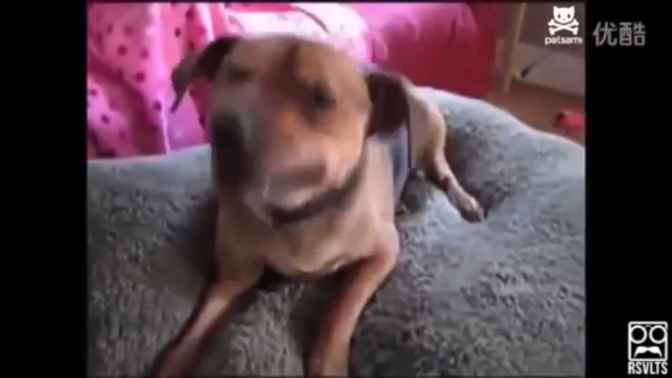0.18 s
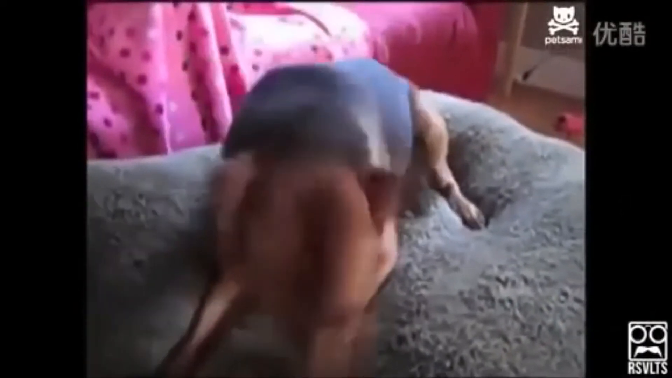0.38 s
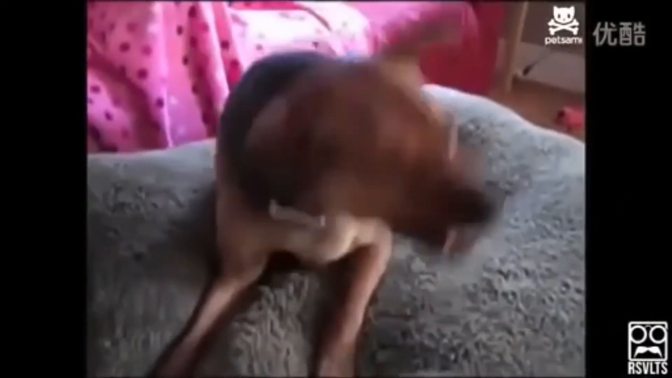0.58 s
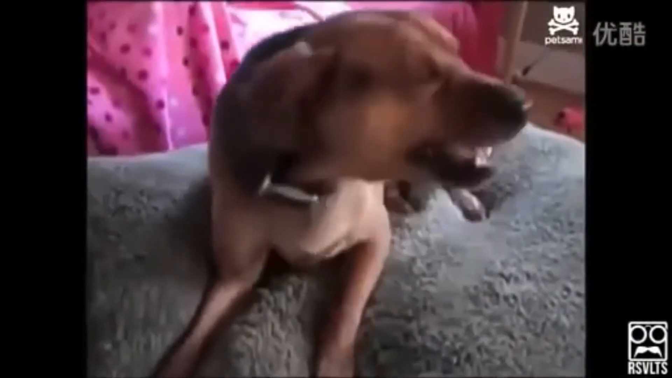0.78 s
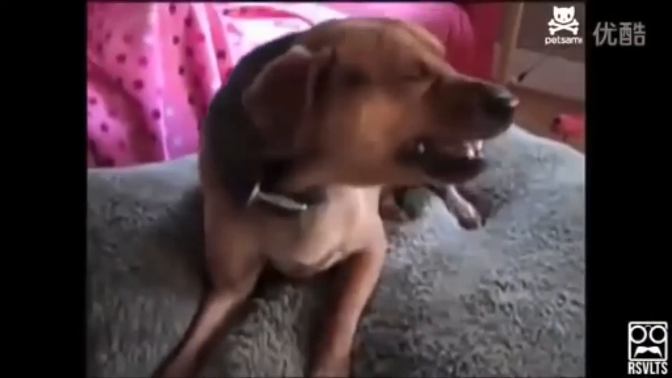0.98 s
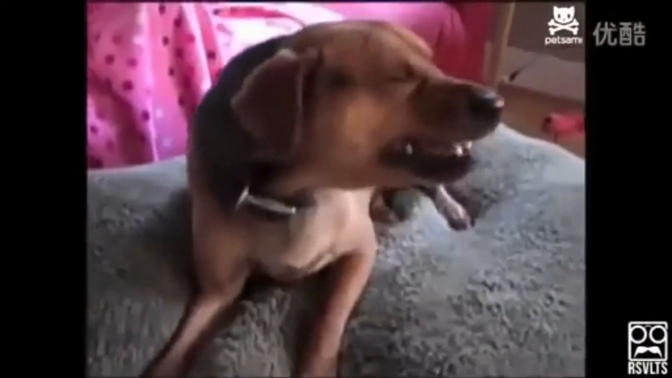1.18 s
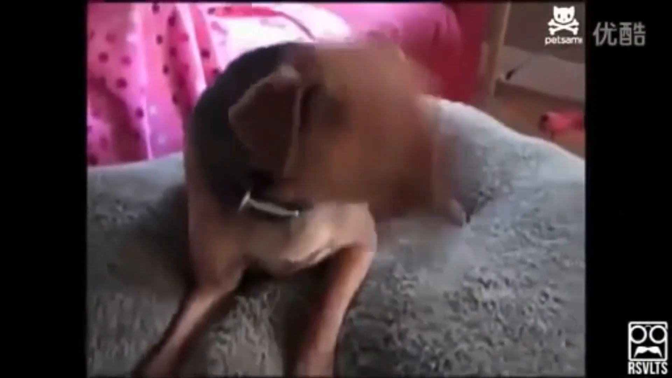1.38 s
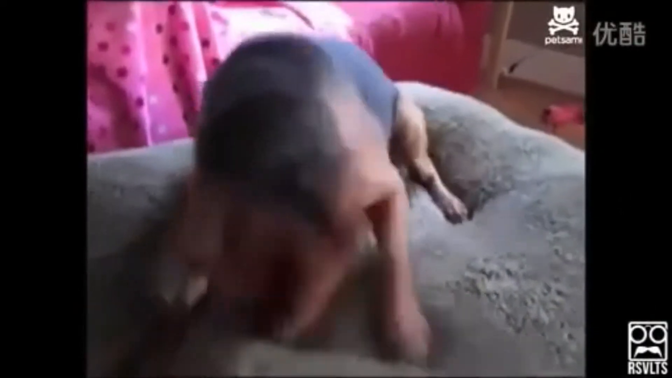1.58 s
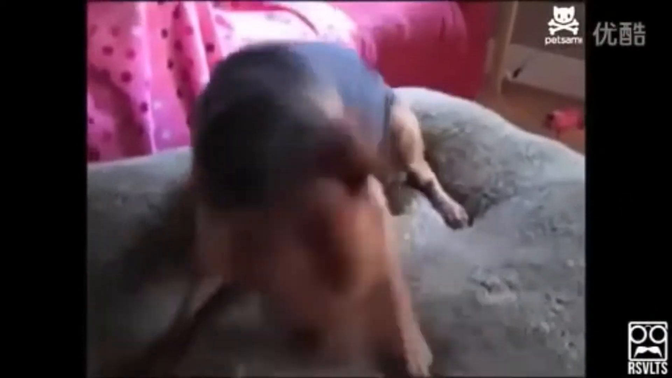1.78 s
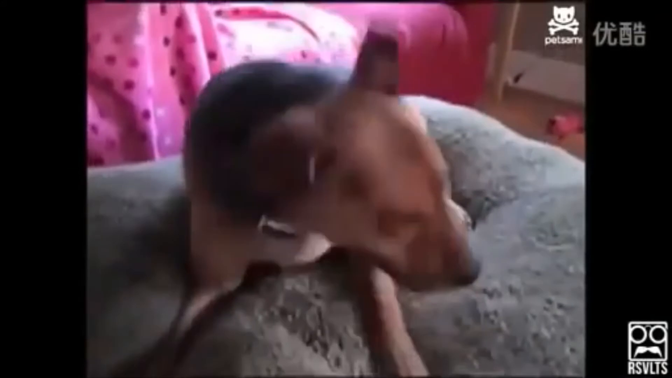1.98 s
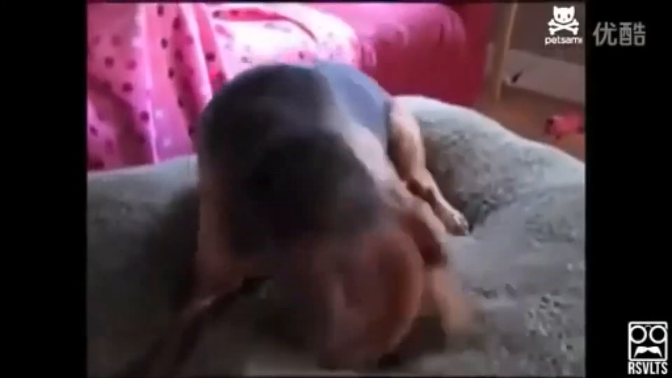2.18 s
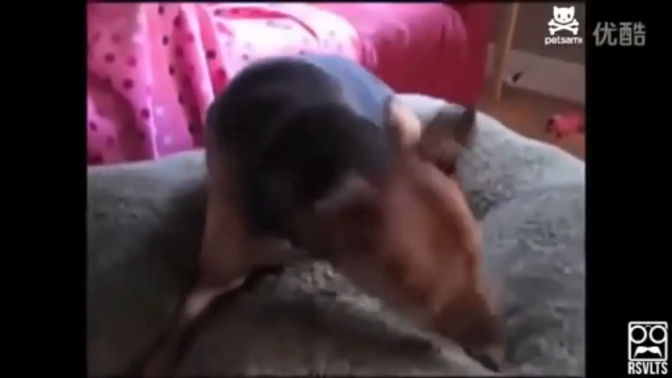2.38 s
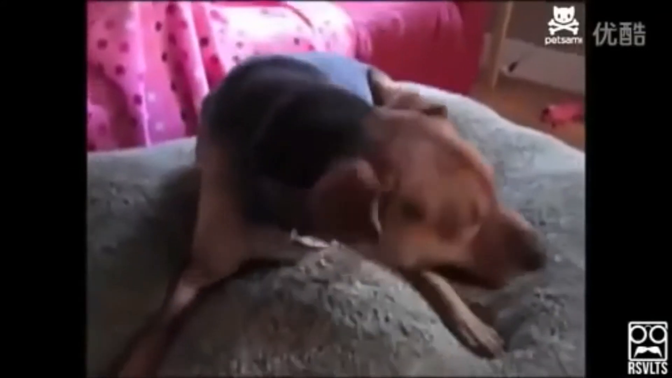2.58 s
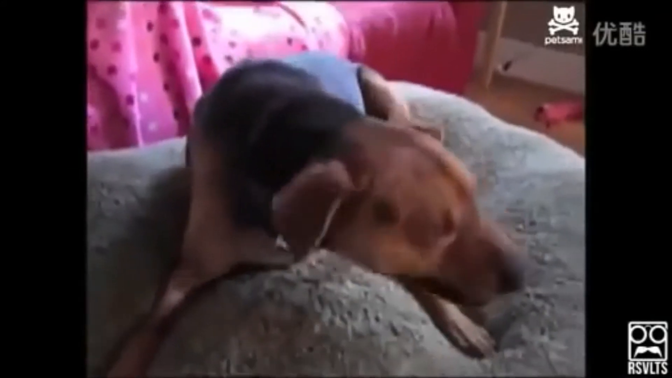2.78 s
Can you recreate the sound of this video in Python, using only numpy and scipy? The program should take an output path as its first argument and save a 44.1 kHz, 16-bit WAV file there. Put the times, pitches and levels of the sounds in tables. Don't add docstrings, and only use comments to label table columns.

```python
import sys
import numpy as np
from scipy import signal
from scipy.io import wavfile
from scipy.ndimage import uniform_filter1d

SR = 44100
rng = np.random.default_rng(int(sys.argv[2]) if len(sys.argv) > 2 else 0)


def log_audio(samples):
    frames = np.atleast_2d(samples).T
    limited = np.clip(frames, -1, 1)
    pcm = np.round(limited * 32767).astype(np.int16)
    wavfile.write(sys.argv[1], SR, pcm)


def attenuation_scalar(level_db):
    decades = np.asarray(level_db, float) / 20
    return 10 ** decades


N = 123480


def evened(x):
    return x / np.sqrt(np.mean(x ** 2) + 1e-20)


def read(points, hz):
    f, value = np.transpose(points)
    return np.interp(np.log(hz + 1), np.log(f + 1), value)


def add(mix, s, sound):
    part = mix[round(s * SR):][:len(sound)]
    part += sound[:len(part)]


def resonate(x, hz, width):
    turn = np.exp(2j * np.pi * np.cumsum(hz * np.ones(len(x))) / SR)
    r = np.exp(-np.pi * width / SR)
    return 2 * (turn * signal.lfilter([1 - r], [1, -r], x / turn)).real


def steep(x, hz, width):
    return evened(resonate(resonate(x, hz, width), hz, width))


def blur(x, bins, frames):
    return uniform_filter1d(uniform_filter1d(x, bins, axis=-2), frames, axis=-1)


def lumps(shape, bins, frames):
    return evened(blur(rng.standard_normal(shape[::-1]).T, bins, frames))


# frequency in Hz, level in dB per Hz.
AIR_SPECTRUM = [(26, -45.5), (45, -6), (81, -1), (167, -13), (475, -16), (592, -18.5), (1170, -21.5),
                (3240, -36.5), (15000, -44)]


def room_air():
    level_db, wide = -44.5, 0.08
    frames, hz = N // 256 + 5, np.fft.rfftfreq(1024, 1 / SR)
    a, b, c, d = rng.standard_normal((frames, 513, 4)).T
    sides = np.array([1, -1])[:, None, None]
    noise = a + 1j * b + wide * sides * (c + 1j * d)
    z = noise * attenuation_scalar(read(AIR_SPECTRUM, hz)[:, None] + 1.2 * lumps(a.shape, 12, 14))
    return attenuation_scalar(level_db) * evened(signal.istft(z, nperseg=1024, noverlap=768)[1][:, :N])


# frequency in Hz, width in Hz, level in dB.
NOSTRIL_BANDS = [(6455, 3120, 4), (8240, 2130, 0.5), (9150, 1560, -4.5), (13000, 1000, -19.5)]


def nostrils(x):
    return evened(sum((-1) ** k * attenuation_scalar(db) * steep(x, hz, width)
                      for k, (hz, width, db) in enumerate(NOSTRIL_BANDS)))


# start in seconds, length in seconds, level in dB, resonance in Hz.
SNIFF_EVENTS = [(0.113, 0.09, -49.5, 6400), (0.15, .12, -52, 4500), (0.451, 0.11, -34.5, 2800),
                (.53, 0.097, -31.5, 2500), (1.267, .03, -59, 2200), (1.6, 0.2, -54, 2100),
                (1.895, 0.27, -33, 2810), (2.037, 0.15, -38.5, 3260), (.6, 0.26, -45.5, 970),
                (2.385, 0.055, -37, 2180), (2.442, 0.19, -35.5, 2260), (.17, .09, -47.5, 2200),
                (2.47, 0.054, -37.5, 3800), (1.94, 0.06, -38, 4900), (.63, 0.26, -48.5, 2570),
                (1.365, 0.066, -57, 4300), (.112, 0.046, -49.5, 2200), (1.78, 0.11, -33.5, 4500)]


def sniff(start, length, db, hz):
    width, wander = 1900, 0.05
    nose_db, low_db = -3.5, -5
    t = np.arange(round(length * SR)) / SR
    a, b, c = rng.standard_normal((SR // 2, 3))[:len(t)].T
    hz = hz * np.exp(wander * evened(uniform_filter1d(c - c.mean(), 900)))
    air = steep(a, hz, width) + attenuation_scalar(nose_db) * nostrils(b) + attenuation_scalar(low_db) * steep(b, 653, 1300)
    flicker_db = 0.3 * evened(uniform_filter1d(c, 100))
    return start, attenuation_scalar(db + flicker_db) * np.sin(np.pi * (t / length) ** 0.51) * air


# start in seconds, level in dB, pitch in Hz, ring in seconds.
SMACK_EVENTS = [(.117, -40, 1590, 0.025), (.217, -19, 700, 0.0091), (.234, -15, 740, 0.011),
                (0.323, -5, 1544, 0.0092), (.358, -9.5, 437, 0.021), (.42, -7.5, 238, 0.0051),
                (.398, -17, 900, .01), (.255, -8.5, 1800, .012), (.243, -13, 1750, 0.02),
                (.362, -14.5, 940, 0.0097), (1.645, -4.5, 865, 0.0091), (1.656, -2.5, 1440, 0.0055),
                (1.721, -19, 496, 0.0043), (1.791, -15, 400, 0.053), (1.801, -14, 297, 0.023),
                (2.117, -14.5, 3050, 0.018), (2.297, -13.5, 775, 0.034), (2.285, -13, 1900, 0.015),
                (2.3, -16, 220, 0.036), (.325, -12, 210, .015), (2.399, -12.5, 2300, 0.0034)]


def smack(start, db, hz, ring_s):
    t = np.arange(round(2 * ring_s * SR)) / SR
    rough = evened(uniform_filter1d(rng.standard_normal(SR // 5), size=30))[:len(t)]
    spit = 1 + hz / 7000 * rough
    fade = attenuation_scalar(db - 60 * t / (2 * ring_s)) * np.minimum(t / 0.0013, 1)
    return start, fade * spit * np.cos(2 * np.pi * hz * t * (1 - 2.2 * t))


# time in seconds, airflow in dB, then in dB over airflow
OUTER_BLASTS = [
    [(0.205, -45.5, -0.5, -13, -4.5), (0.23, -34.5, -6.5, 2.5, -4), (0.254, -18, 2, -16.5, -12.5),
     (0.28, -11.5, -1.5, -16.5, -19), (0.32, -17.5, -2, -5, -13), (0.374, -24, -3.5, -5.5, -3.5),
     (0.47, -39, -2, 2, -3.5)],
    [(2.125, -31, -9, -6, -23), (2.148, -24.5, -12, -3.5, -21), (2.172, -15, -0.5, -17, -19.5),
     (2.19, -19.5, -2, -7, -15), (2.204, -12, -4.5, -13, -19), (2.225, -17.5, -4, -7, -20),
     (2.292, -26, -0.5, 4.5, -5.5), (2.328, -18, -10.5, -18.5, -16), (2.39, -38, 3.5, 4.5, -17)],
]
LONG_BLASTS = [
    [(1.44, -25.5, -35, -13, -25), (1.448, -49.5, -3, -6, -21), (1.46, -18, -21, -17.5, -20),
     (1.484, -21, -6.5, -6, -5.5), (1.505, -25.5, -3, -2.5, -10)],
    [(1.505, -22, 10.5, -13.5, -5.5), (1.517, -12.5, -8.5, -6, -4), (1.565, -18, -7, -1.5, 6.5),
     (1.589, -13.5, -11, -9, -12.5), (1.695, -29, 5, 9.5, -8.5)],
    [(1.69, -28.5, -7, 2, -4.5), (1.722, -21, -4.5, -0.5, -11), (1.784, -25, -3, 1.5, -21),
     (1.872, -20, -10, -17.5, -35), (1.915, -44, -1, 2, -18)],
]
# mouth in Hz, cheek in Hz, flaps per second,
# whistle share 0-1, spit noise in dB over flaps.
MUZZLE_SHAPES = [(4450, 1270, 65, 0.3, 13), (3430, 610, 130, 0.06, 6.5), (2906, 310, 150, 0, 3.5),
                 (3280, 830, 190, 0.2, 5), (2950, 1400, 130, 0, 9)]


def blast(curve, mouth_hz, cheek_hz, rate, whistle, wet_db):
    mouth_width, whistle_width, cheek_width = 1500, 300, 890
    s, flow_db, leak_db, jowl_db, cheek_db = np.transpose(curve)
    t = s[0] + np.arange(round((s[-1] - s[0]) * SR)) / SR
    a, b, c, d, e = rng.standard_normal((round(.3 * SR), 5))[:len(t)].T

    turns = np.cumsum(rate * np.exp(0.45 * evened(uniform_filter1d(c, 300)))) / SR
    flaps = np.diff(np.floor(turns), prepend=0) * attenuation_scalar(5.5 * np.clip(d, -2, 1))
    u = np.arange(300) / SR
    gust = np.convolve(flaps, np.exp(-u / 0.0046))[:len(t)]
    flicker = attenuation_scalar(0.93 * evened(uniform_filter1d(e, 250)))
    chop = evened(1 + 0.12 * evened(gust)) * flicker

    whistle = np.clip(whistle, 0, 1)
    mouth_hz = mouth_hz * np.exp(0.07 * evened(uniform_filter1d(a, 1200)))
    mouth = (1 - whistle) * steep(b, mouth_hz, mouth_width)
    mouth += whistle * steep(b, mouth_hz, whistle_width)
    mouth -= attenuation_scalar(-6.5) * steep(b, 0.49 * mouth_hz, mouth_width)
    air = chop * (nostrils(a) + attenuation_scalar(np.interp(t, s, leak_db)) * evened(mouth))

    knock = evened(flaps) + attenuation_scalar(wet_db) * chop * e
    cheek_hz = cheek_hz * np.exp(0.2 * evened(uniform_filter1d(b, 1500)))
    cheek = steep(knock, cheek_hz, cheek_width) - 0.53 * steep(knock, 1.9 * cheek_hz, cheek_width)

    puff_s = 0.00031
    puff = np.convolve(flaps, u / puff_s * np.exp(-u / puff_s))[:len(t)]
    jowl = evened(resonate(knock, 405, 110))
    jowl += attenuation_scalar(0.5) * evened(puff - uniform_filter1d(puff, 500))
    jowl += attenuation_scalar(-9.5) * steep(knock, 98, 45)
    lips = attenuation_scalar(np.interp(t, s, cheek_db)) * evened(cheek) + attenuation_scalar(np.interp(t, s, jowl_db)) * evened(jowl)

    edge = np.clip(np.minimum(t - s[0], s[-1] - t) / 0.004, 0, 1)
    return s[0], edge * attenuation_scalar(np.interp(t, s, flow_db)) * (air + lips)


def patchy(x):
    z = signal.stft(x, nperseg=512)[2]
    return signal.istft(z * attenuation_scalar(2.4 * lumps(z.shape, 6, 6)), nperseg=512)[1][:N]


# start in seconds, length in seconds, level in dB, first pitch in Hz, last pitch in Hz.
GRUNT_EVENTS = [
    (0.235, 0.049, -31.5, 117, 250),
    (1.465, 0.012, -13.5, 387, 248),
    (2.14, 0.039, -24, 216.6, 233.5),
    (2.264, 0.056, -26.5, 374, 419),
    (2.521, 0.008, -34, 344, 322),
    (0.48, 0.016, -34.5, 194, 189),
    (2.598, 0.194, -51, 97.2, 71),
]


def grunt(start, length, db, first_hz, last_hz):
    t = np.arange(round(length * SR)) / SR
    turn = 2 * np.pi * np.cumsum(first_hz + (last_hz - first_hz) * t / length) / SR
    octave = attenuation_scalar(-3.5) * (first_hz < 250)
    swell = np.sin(np.pi * (t / length) ** 0.7)
    return start, attenuation_scalar(db + 7) * swell * (np.sin(turn) + octave * np.sin(2 * turn))


# start in seconds, level in dB, rattle length in seconds, edge-on share 0-1.
CLINK_EVENTS = [
    (0.487, -24.5, 0.0076, 0.3),
    (0.62, -20, 0.0076, 0),
    (1.881, -33, 0.0075, 0.5),
    (2.0227, -26, .008, 0.4),
    (2.3968, -21, 0.0072, 0.02),
    (2.5388, -23, 0.0081, 1),
]
# frequency in Hz, level flat-on in dB, level edge-on in dB, t60 in seconds.
TAG_MODES = [(3540, -8, -32, 0.011), (4670, -4.5, -12, 0.0091), (5225, -0.5, 2, 0.0079),
             (5700, -11.5, -20, .006), (6190, -6.5, -16, 0.009), (7150, 0.5, -10.5, 0.0088),
             (7850, 2.5, -15.5, 0.013), (8400, 0.5, -8.5, 0.0064), (9600, 0, -18, 0.01),
             (10040, -9, -4, 0.018), (11320, -10, -9, 0.0061), (12800, -5, -21, .005)]
# frequency in Hz, width in Hz, level in dB, t60 in seconds.
TAG_SHIVER = [(7930, 540, -20, 0.42), (5250, 300, -26, 0.35)]
THIN_RING_HZ = 14300


def clink(start, db, length, edge_on):
    t = np.arange(round(.3 * SR)) / SR
    chance, sign, grit = rng.random((len(t), 3)).T
    u, edge_on = np.clip(t / length, 0, 1), np.clip(edge_on, 0, 1)
    taps_per_s = 4000
    taps = (chance < taps_per_s / SR) * (sign - .5) * np.sin(np.pi * u ** 0.73) ** 2

    ring = np.zeros(len(t))
    for hz, flat, edge, t60 in TAG_MODES:
        mode_db = flat + (edge - flat) * edge_on - 60 * t / t60
        ring += attenuation_scalar(mode_db) * np.sin(2 * np.pi * (hz * t + rng.random()))
    band = signal.butter(3, [4800, 10300], "band", fs=SR, output="sos")
    ring += attenuation_scalar(-2 - 60 * t / 0.0059) * evened(signal.sosfilt(band, grit - .5))
    sound = signal.fftconvolve(taps, ring)[:len(t)]

    thin = attenuation_scalar(-24 - 60 * t / 0.08) * u * np.sin(2 * np.pi * THIN_RING_HZ * t)
    shiver = sum(attenuation_scalar(level - 60 * t / t60) * steep(sign - .5, hz, width)
                 for hz, width, level, t60 in TAG_SHIVER)
    thin += (1 - edge_on) ** 2 * u * shiver
    attack = np.sqrt(np.mean(sound[:300] ** 2))
    return start, attenuation_scalar(db + 7) * (sound / attack + thin)


# frequency in Hz, t60 in seconds.
ROOM_DECAY = [(200, .4), (1500, .55), (7000, .65), (13000, .4)]


def room(x):
    wide, gap_s, early, early_s = 0.15, 0.004, 2.2, 0.014
    mid, side = rng.standard_normal((2, SR // 2))
    noise = np.array([mid + wide * side, mid - wide * side])
    hz, t, z = signal.stft(noise, SR, nperseg=256)
    tail = signal.istft(z * attenuation_scalar(-60 * t / read(ROOM_DECAY, hz)[:, None]), SR, nperseg=256)[1]
    t = np.arange(tail.shape[1]) / SR
    tail *= np.clip(t / gap_s - 1, 0, 1) * (1 + early * np.exp(-t / early_s))
    return signal.fftconvolve(x[None], tail / np.linalg.norm(tail[0]), axes=1)[:, :N]


# time in seconds, extra left-right scatter in dB.
HEAD_SWING = [(.15, 0), (.23, 8), (.36, 4), (.42, -1), (1.42, -1), (1.45, 9), (1.53, 8), (1.58, -2),
              (1.9, 2), (2.0, 4), (2.1, 0), (2.2, 7), (2.32, 0)]


def swing(dog):
    z = signal.stft(dog, nperseg=256)[2]
    z = z * attenuation_scalar(4.5 * lumps(z.shape, 5, 24))
    turn = 5.2 * lumps(z.shape, 3, 6)
    swing_db = -20 + np.interp(np.arange(N) / SR, *np.transpose(HEAD_SWING))
    return attenuation_scalar(swing_db) * signal.istft(z * np.exp(1j * turn), nperseg=256)[1][:N]


def scene():
    dog, tag = np.zeros(N), np.zeros(N)
    soften = signal.firwin(41, 14300, fs=SR)
    for curve, muzzle in zip(OUTER_BLASTS + LONG_BLASTS, MUZZLE_SHAPES):
        add(dog, *blast(curve, *muzzle))
    for row in SNIFF_EVENTS:
        add(dog, *sniff(*row))
    dog = patchy(dog)
    for row in GRUNT_EVENTS:
        add(dog, *grunt(*row))
    for row in SMACK_EVENTS:
        add(dog, *smack(*row))
    jingle = attenuation_scalar(-38) * dog.std() * steep(dog, THIN_RING_HZ, 40)
    dog = jingle + np.convolve(dog, soften, "same")
    for row in CLINK_EVENTS:
        add(tag, *clink(*row))
    wet = dog + attenuation_scalar(-3) * tag
    dog = dog + tag
    side = swing(dog) + 0.2 * tag
    sides = np.array([[1], [-1]])
    air = signal.oaconvolve(room_air(), soften[None], "same")
    direct = dog * attenuation_scalar(0.3 * sides) + side * sides
    return direct + attenuation_scalar(-12.5) * room(wet) + air * attenuation_scalar(1.1 * sides)


# frequency in Hz, side over mid in dB.
SIDE_FLOOR = [(500, -28), (1000, -17), (2000, -14), (15000, -13)]


def joint_stereo(x):
    mid, side = signal.stft(np.array([x[0] + x[1], x[0] - x[1]]) / 2, nperseg=1024)[2]
    mid_power, side_power = blur(abs(np.array([mid, side])) ** 2, 13, 3)
    floor = attenuation_scalar(2 * read(SIDE_FLOOR, np.fft.rfftfreq(1024, 1 / SR)))[:, None]
    kept = signal.istft(side * (side_power > mid_power * floor), nperseg=1024)[1][:N]
    return x.mean(0) + kept * np.array([[1], [-1]])


def low_pass(x):
    return signal.sosfilt(signal.butter(12, 15840, fs=SR, output="sos"), x)


def record(dry):
    ceiling = 1.2
    x = signal.sosfilt(signal.butter(2, 42, "high", fs=SR, output="sos"), dry)
    x = ceiling * np.tanh(x / ceiling)
    treble_edge = signal.firwin(127, 15200, window=("kaiser", 7), fs=SR)
    x = signal.oaconvolve(x, treble_edge[None], "same")
    return low_pass(joint_stereo(x))


dry = scene()
out = record(dry)
log_audio(out)
```